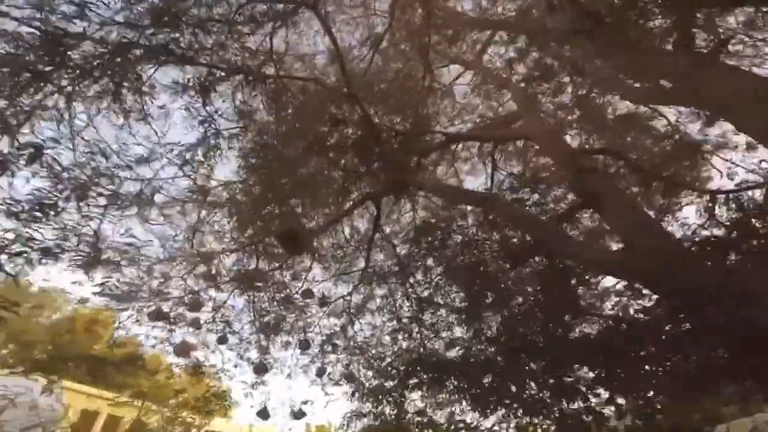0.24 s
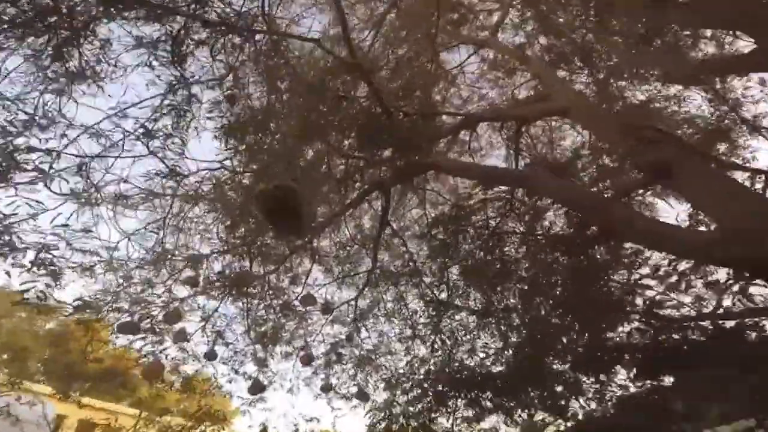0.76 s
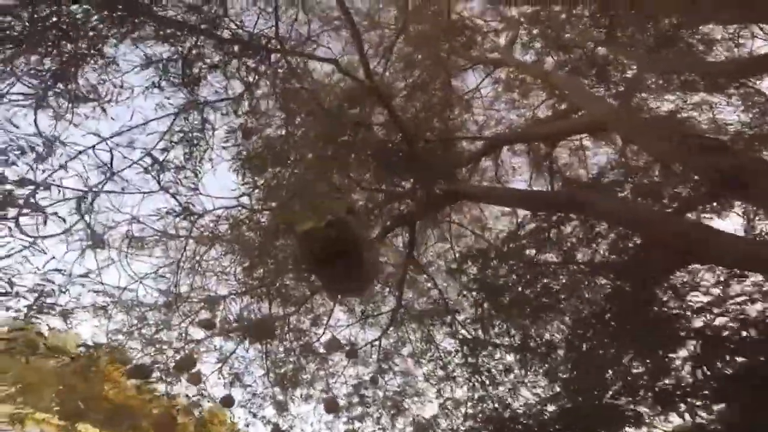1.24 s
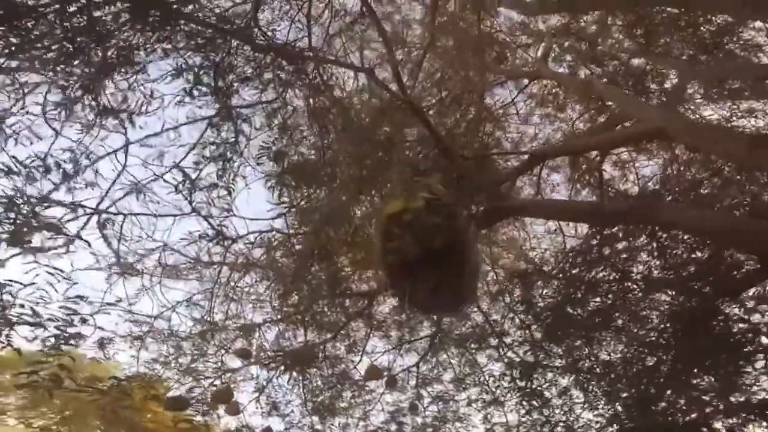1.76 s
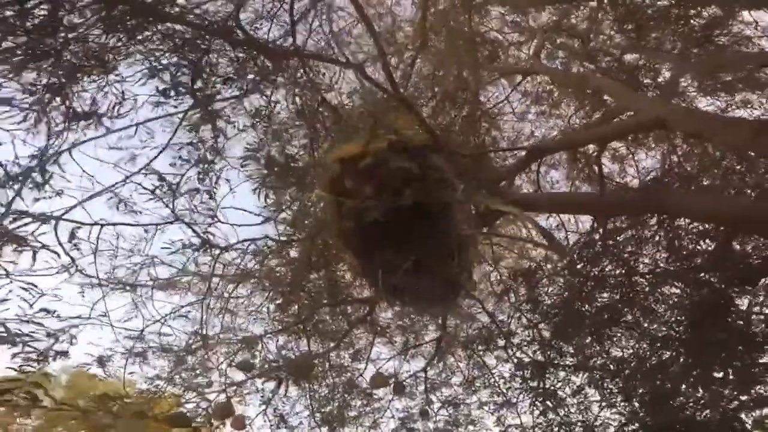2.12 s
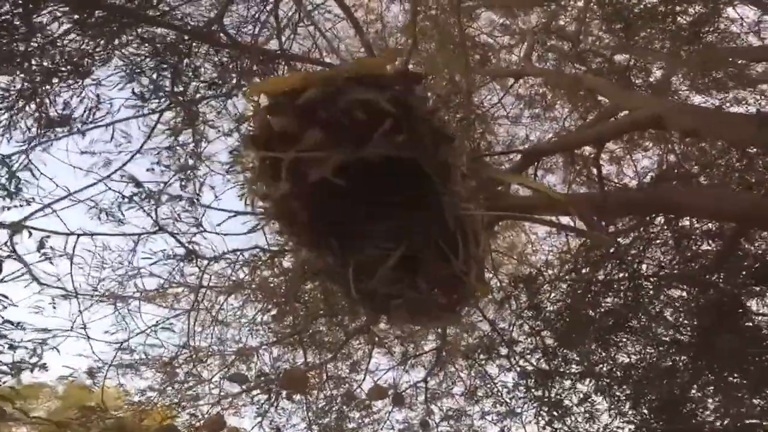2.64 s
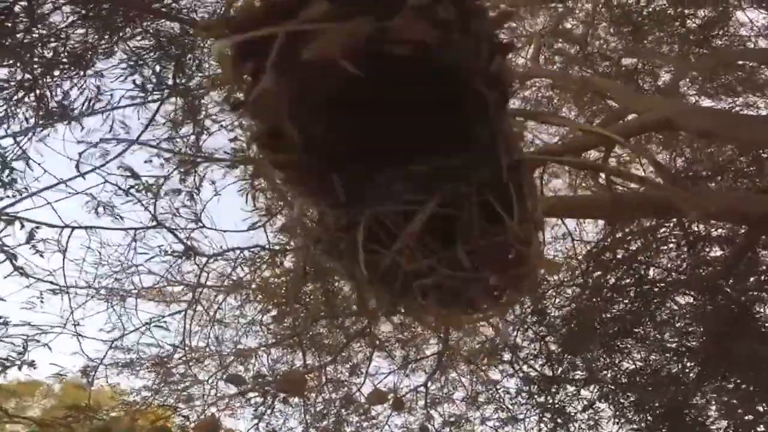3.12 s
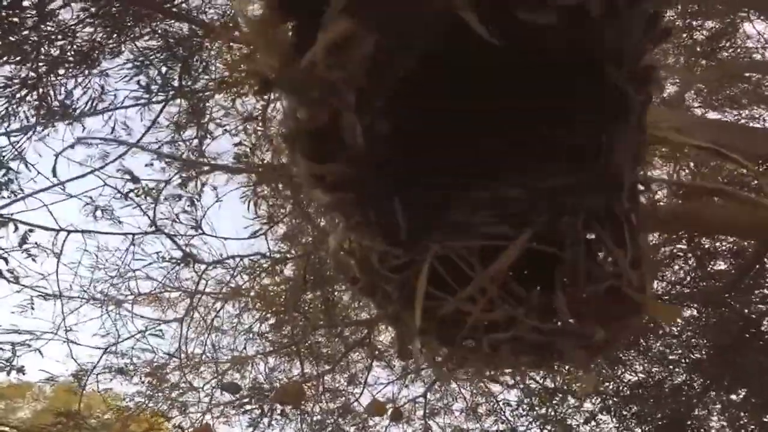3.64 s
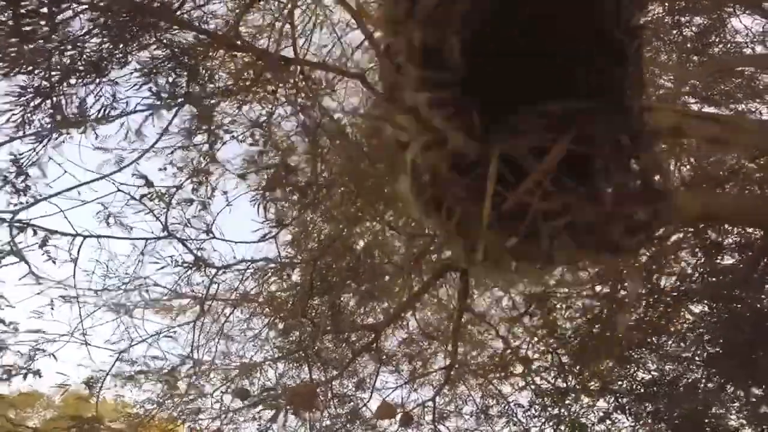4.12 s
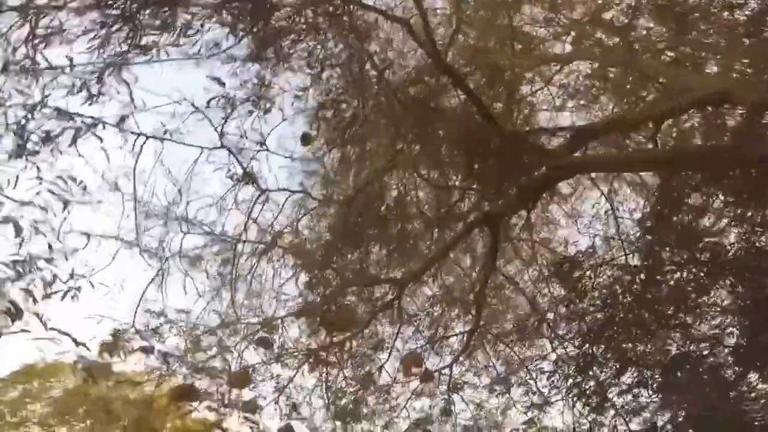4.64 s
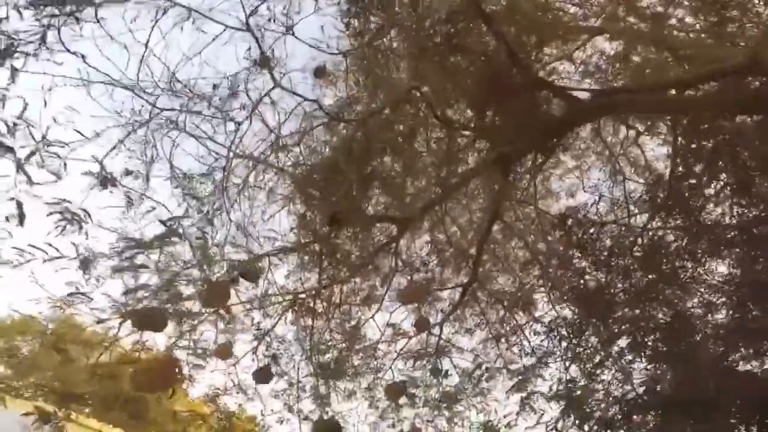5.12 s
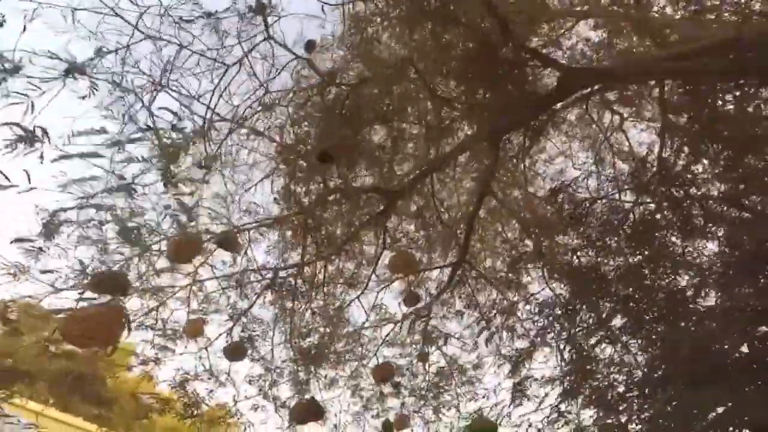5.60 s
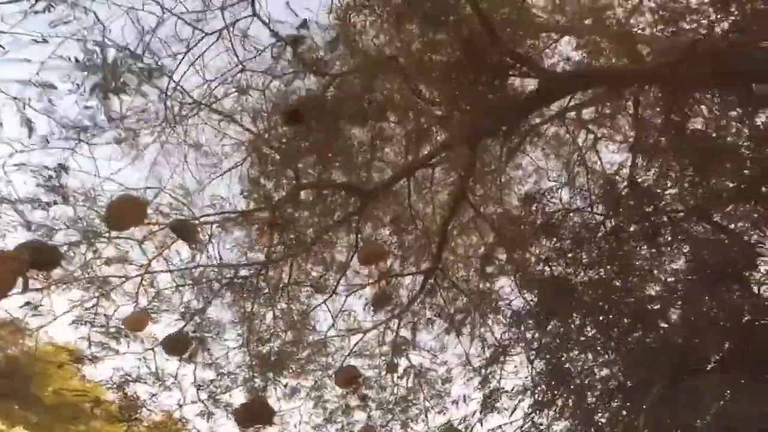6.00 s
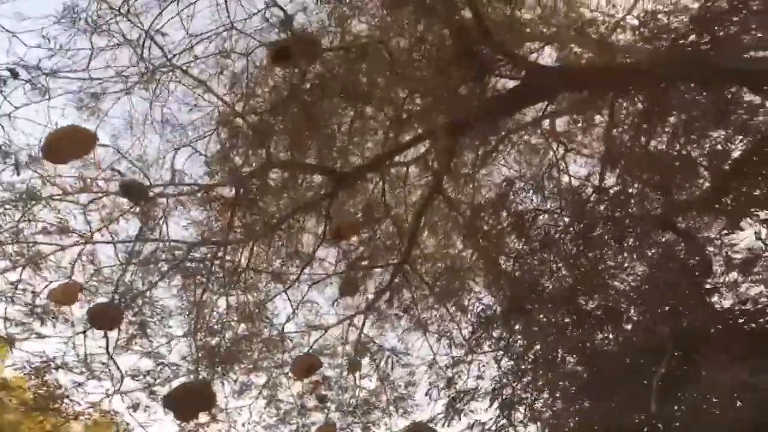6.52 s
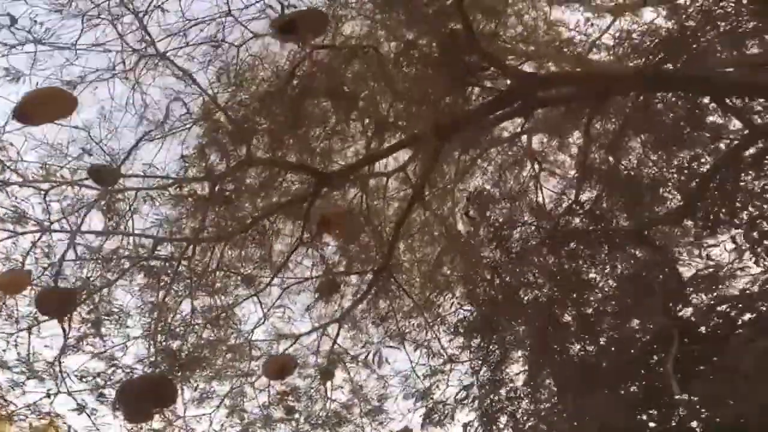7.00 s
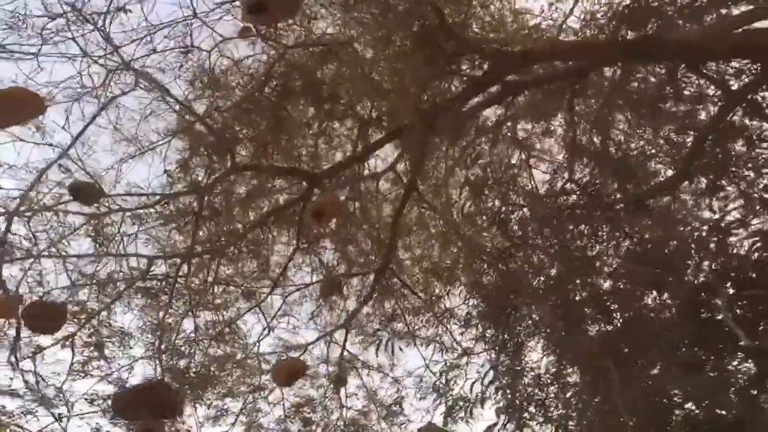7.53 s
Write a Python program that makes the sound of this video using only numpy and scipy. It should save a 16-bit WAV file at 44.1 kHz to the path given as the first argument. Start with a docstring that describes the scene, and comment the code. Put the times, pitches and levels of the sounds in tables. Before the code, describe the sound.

Weaver birds give sharp, down-slurred chips and brief harsh rasps in a nest-hung tree, over early low microphone rumble and handling knocks.

```python
"""Weaver birds call in a tree hung with nests: gliding whistles make short down-slurred chips, often in pairs,
and pulsed noise with a zigzag whistle makes harsh rattling rasps. Scattered echoes surround them; noise makes
the open air and the thin chatter of the colony. At the hand-held microphone, filtered noise rumbles for two
seconds and fades away, damped modes knock, and the housing pulses softly about ten times a second. A decaying
step makes one dry click."""
import sys
import numpy as np
from scipy import signal
from scipy.fft import rfft, irfft
from scipy.io import wavfile
from scipy.ndimage import uniform_filter1d

SR = 44100
rng = np.random.default_rng(int(sys.argv[2]) if len(sys.argv) > 2 else 0)


def pcm_store(signal):
    """Save signal as 16-bit PCM."""
    levels = np.round(np.clip(np.atleast_2d(signal), -1, 1) * 32767)
    wavfile.write(sys.argv[1], SR, levels.astype(np.int16).T)


N = 342216
TIME = np.arange(N) / SR
CHIP_LEAD_S = .035   # room in each chip ahead of its pitch break

# spectrum of the hoarse voice, moved in pitch for each call: frequency_hz, level_db
RASP_SPECTRUM = [(600, -36), (1300, -18.5), (2000, -17), (3000, -17.5), (4500, -7.5), (5700, -0.5),
                 (6600, -15.5), (7500, -19.5), (8400, -32), (9700, -18.5), (11800, -34), (13500, -24),
                 (16000, -40)]
# strength of the distant birds over time: time_s, far_calls_db, colony_chatter_db
DISTANT_LEVELS = [(0.0, -60, -59), (0.34, -61, -59), (0.5, -62, -63), (3.02, -61, -63), (3.18, -59, -53),
                  (4.02, -61, -61), (4.95, -58, -57), (7.76, -63, -65)]
# where the birds sit, by name: left_minus_right_db, left_port_lead_radians, rasp_pitch_factor
PERCHES = {"right": (-4, 1.0, 1.05), "overhead": (-.8, 2.2, 1.09)}


def from_db(db):
    """Amplitude ratio of a level: 20 dB is a factor of ten."""
    return 10 ** (np.asarray(db) / 20)


def rms_one(x):
    """Normalise the root-mean-square amplitude to 1."""
    return x / np.sqrt(np.mean(x ** 2) + 1e-20)


def in_time(rows):
    """Linear interpolation in time of each column of a curve."""
    times_s, *columns = np.transpose(rows)
    return [np.interp(TIME, times_s, column) for column in columns]


def coloured(x, spectrum, shift=1):
    """Linear filtering by a frequency_hz, level_db spectrum, moved in pitch by a factor."""
    hz, db = np.transpose(spectrum)
    bins_hz = np.fft.rfftfreq(len(x), 1 / SR) + 1
    gain = from_db(np.interp(np.log(bins_hz), np.log(hz * shift), db))
    return irfft(rfft(x) * gain, len(x))


def noise(spectrum, size=N, shift=1):
    """Random noise shaped by a spectrum, rms 1."""
    return rms_one(coloured(rng.standard_normal(size), spectrum, shift))


def drift(rate_hz, size=N):
    """Random modulation: normal values, drawn at a given rate and joined by straight lines."""
    steps = np.arange(size) * rate_hz / SR
    count = int(steps[-1]) + 2
    return np.interp(steps, np.arange(count), rng.standard_normal(count))


def add(out, start_s, sound):
    """Superposition: mix a sound in from a given time."""
    start = max(round(start_s * SR), 0)
    part = out[..., start:start + sound.shape[-1]]
    part += sound[..., :part.shape[-1]]


def delayed(x, delay_s):
    """Propagation delay, silent before arrival."""
    return np.interp(TIME - delay_s, TIME, x, left=0)


def panned(left_minus_right_db):
    """Gains of the two ports for a level difference between them."""
    return from_db(np.array([[left_minus_right_db], [-left_minus_right_db]]) / 2)


def chips():
    """Near chips as direct sound and as excitation of the tree; only the hoarse bird sits overhead."""
    # by kind of note: sink_before_break_share, median_fall_s, knee_hz (for a break at 5200 Hz),
    # tail_s, onset_db, hoarseness_db, most_echo_db
    kinds = {"long": (.05, .0016, 3800, .0125, -7, -22, -43.3),
             "short": (.105, .0019, 3600, .008, -5.5, -21, -45.5),
             "high": (.115, .0036, 3780, .0095, -13, -17, -41.5),
             "hoarse": (.11, .004, 3780, .012, -14, -14, -38.5)}
    direct, send = np.zeros((2, N)), np.zeros(N)
    for break_s, top_hz, level_db, kind in notes():
        *voice_settings, most_echo_db = kinds[kind]
        call = chip(top_hz, *voice_settings)
        perch = "overhead" if kind == "hoarse" else "right"
        start_s = break_s - CHIP_LEAD_S
        add(direct, start_s, from_perch(call * from_db(level_db), perch))
        add(send, start_s, call * from_db(echo_db(level_db, most_echo_db, -4)))
    return direct, send


def notes():
    """Call and answer: every single note, with each pair opened into a long note and a short one."""
    # near chips: pitch_break_s, top_pitch_hz, level_db, kind
    calls = [(.275, 5760, -37.8, "long"), (.464, 5620, -41.5, "short"), (1.096, 5920, -35, "long"),
             (1.169, 5450, -39.5, "short"), (1.207, 5580, -40, "short"), (1.767, 5530, -39.5, "long"),
             (1.797, 5350, -48, "short"), (2.353, 5540, -35, "pair"), (2.85, 6900, -57, "high"),
             (2.945, 6800, -59, "high"), (3.025, 5520, -34.5, "long"), (3.564, 6900, -54, "high"),
             (3.768, 5560, -35, "pair"), (4.019, 6700, -50, "high"), (4.256, 5550, -36.5, "pair"),
             (4.45, 5600, -40, "short"), (4.599, 7000, -50, "high"), (4.855, 6830, -51, "high"),
             (4.901, 5480, -36, "long"), (5.573, 7030, -45, "high"), (5.675, 5540, -38.5, "pair"),
             (6.012, 7030, -45, "high"), (6.381, 6920, -37.5, "high"), (6.532, 5430, -34.8, "pair"),
             (6.825, 6870, -34.5, "high"), (7.191, 5570, -43.5, "short"), (7.337, 6900, -32.7, "hoarse"),
             (7.421, 6650, -34.7, "hoarse")]
    answer_s, answer_pitch_factor, answer_db = .0805, .968, -.9   # against the first note
    for break_s, top_hz, level_db, kind in calls:
        if kind == "pair":
            yield break_s, top_hz, level_db, "long"
            yield break_s + answer_s, top_hz * answer_pitch_factor, level_db + answer_db, "short"
        else:
            yield break_s, top_hz, level_db, kind


def chip(top_hz, sink_share, fall_s, knee_hz, tail_s, onset_db, rough_db,
         hold_s=0.0275, sag_per_s=6.5, droop_share=.08, tail_db=-8, drop_db=-4.5,
         beat_hz=3900, beat_db=-17.5, beat2_db=-21.5, under_db=-17.5, octave_db=-14,
         waver=0.012, beat_waver=.02, shimmer_db=3.0):
    """Two-voiced syrinx: a whistle flicks up, sinks, then breaks down; a second vibration adds side tones."""
    t = np.arange(int((CHIP_LEAD_S + tail_s + .004) * SR)) / SR - CHIP_LEAD_S   # 0 at the break
    after = np.maximum(t, 0)
    progress = np.clip(1 + t / hold_s, 0, 1)
    break_hz = top_hz * (1 - sink_share)
    height = break_hz / 5200

    held_hz = np.interp(progress, [0, .2, 1], [top_hz * .88, top_hz, break_hz])
    fallen = 1 - np.exp(-after / (fall_s * rng.lognormal(0, .2)))
    slack = 1 - sag_per_s * after - droop_share * (after / t[-1]) ** 3
    falling_hz = held_hz + (knee_hz * height ** .5 - break_hz) * fallen
    hz = falling_hz * slack * (1 + waver * drift(920, len(t)))
    phase = 2 * np.pi * np.cumsum(hz) / SR

    wavering_beat_hz = beat_hz * (1 + beat_waver * height ** 3 * drift(1527, len(t)))
    beat = 2 * np.pi * np.cumsum(wavering_beat_hz) / SR
    sides = from_db(beat_db) * np.sin(phase + beat) + from_db(beat2_db) * np.sin(phase + 2 * beat)
    lower_sides = np.sin(phase - beat) + .5 * np.sin(phase - 2 * beat)
    sides += from_db(under_db) * height ** 3 * lower_sides

    effort = from_db(onset_db * np.maximum(1 - progress / .65, 0))
    voice = np.sin(phase) + (1 - fallen) * (1 - progress ** 2 / 2) * sides
    voice += fallen ** 2 * from_db(octave_db) * np.sin(2 * phase)
    # strain makes the voice hoarse
    voice += from_db(rough_db) * effort * noise(RASP_SPECTRUM, len(t), height)
    # the voice thins while it drops
    fade_db = tail_db * fallen + drop_db * np.sin(np.pi * fallen)
    gate = np.clip((t + hold_s) / 0.0047, 0, 1) * np.clip((t[-1] - t) / 0.007, 0, 1)
    return np.sqrt(2) * voice * gate * effort * from_db(fade_db + shimmer_db * drift(432, len(t)))


def rasps(swell_s=.037, release_s=0.0095, onset_db=-14, start_pitch=.83, slap_hz=214, depth=.62, jitter=.08,
          whistle_hz=5800, whistle_db=-4, swing=.13, waver=.04):
    """Pulsed source and rising throat resonances: the syrinx slaps open and shut, swelling and stopping."""
    # rasps: start_s, level_db, perch
    rasp_calls = [(.116, -27.8, "right"), (1.2, -30.3, "right"), (3.065, -28.5, "overhead"),
                  (3.195, -40.5, "overhead"), (3.294, -49, "overhead"), (3.425, -26.5, "right"),
                  (4.946, -27, "right")]
    direct, send = np.zeros((2, N)), np.zeros(N)
    t = np.arange(SR // 10) / SR
    opening = np.maximum(1 - t / swell_s, 0)   # falls from 1 to 0 during the swell
    rise = 1 - (1 - start_pitch) * opening ** 3
    release = np.exp(-np.maximum(t - swell_s, 0) / release_s)
    envelope = from_db(onset_db * opening ** 2) * release * np.minimum(t / 0.0027, 1)
    for start_s, level_db, perch in rasp_calls:
        shift = PERCHES[perch][2]
        cycle = 2 * np.pi * np.cumsum(slap_hz * (1 + jitter * drift(170, len(t)))) / SR
        bursts = 1 + depth * (1 - opening / 2) * np.cos(cycle)
        # reading fourfold oversampled noise at a growing speed raises the resonances
        fine_noise = signal.resample(noise(RASP_SPECTRUM, len(t), shift), len(t) * 4)
        throat = np.interp(np.cumsum(rise) * 4, np.arange(len(t) * 4), fine_noise)
        zigzag = 1 - swing * np.cos(cycle) + waver * drift(1500, len(t))
        hz = whistle_hz * shift * rise * zigzag
        throat += from_db(whistle_db) * np.sqrt(2) * np.sin(2 * np.pi * np.cumsum(hz) / SR)
        # every slap is about equally strong
        throat /= np.sqrt(uniform_filter1d(throat ** 2, size=64) + 1e-12)
        call = envelope * rms_one(bursts * throat)
        add(direct, start_s, from_perch(call * from_db(level_db), perch))
        add(send, start_s, call * from_db(echo_db(level_db, -35.2, 1.5)))
    return direct, send


def from_perch(call, perch):
    """Directional cues: a level difference and a turn of phase between the two ports."""
    left_db, turn, _ = PERCHES[perch]
    turned = np.real(signal.hilbert(call) * np.exp(-1j * turn))
    return np.array([call, turned]) * panned(left_db)


def echo_db(level_db, most_db, wet_db):
    """Reverberant level: a bird that turns away still fills the tree; only the echo of faint calls sinks."""
    return min(most_db, level_db + wet_db)


def far_calls(waver=.04, faint_per_s=10, low_hz=1000, high_hz=3400, faint_db=3):
    """Frequency-modulated short notes from far off; faint random ones rise and sink with the far wash."""
    # far birds with lower voices: centre_s, pitch_hz, level_db
    distinct = [(2.53, 2950, -52), (3.7, 4050, -53), (4.62, 2890, -49.5), (5.02, 2830, -52)]
    out, size = np.zeros(N), SR // 20
    wash_db = in_time(DISTANT_LEVELS)[0]
    faint = []
    for when, pitch in rng.random((int(faint_per_s * N / SR), 2)):
        hz = low_hz * (high_hz / low_hz) ** pitch
        faint.append((when * N / SR, hz, wash_db[int(when * N)] + faint_db))
    for centre_s, hz, level_db in distinct + faint:
        phase = 2 * np.pi * np.cumsum(hz * (1 + waver * drift(480, size))) / SR
        note = np.sqrt(2) * np.hanning(size) * np.sin(phase)
        add(out, centre_s - size / SR / 2, from_db(level_db) * note)
    return out


def tree(x, t60_s=.61, leaf_cut_hz=11000):
    """Multiple scattering: branches and nests spread the calls into a thin tail, different at each side."""
    t = np.arange(int(.6 * SR)) / SR
    decay = from_db(-60 * t / t60_s) * np.clip((t - .005) / 0.002, 0, 1)
    scatter = rng.standard_normal((2, len(t))) * decay
    scatter *= 1 + 3.6 * np.exp(-t / 0.036)   # near twigs answer first and loudest
    # leaves soak up the top
    x = signal.sosfilt(signal.butter(2, leaf_cut_hz, fs=SR, output="sos"), x)
    return np.array([signal.fftconvolve(x, side / np.linalg.norm(side))[:N] for side in scatter])


def handling(rumble_side_db=-20, thud_db=20.5, thud_follows=.38, pulse_db=-41, pulse_period_s=.10238,
             bump_db=-3, bump_s=0.0026, click_s=1.7975, click_db=-20.5, click_decay_s=0.007,
             stiff_hz=140, snap_db=3.5):
    """Structure-borne sound: rumble, knocks and soft regular housing pulses. Apart from these, one dry click: a
    sudden step that dies away."""
    # spectrum of the rumble: frequency_hz, level_db
    rumble_spectrum = [(12, -13.5), (22, -1), (33, 1.5), (48, -8.5), (70, -12), (100, -17.5), (150, -32),
                       (300, -48.5), (700, -72.5)]
    # knocks on the housing: contact_s, body_db, bright_snap_db (before the common snap gain)
    knocks = [(.577, -31, -44), (.590, -31.5, -37), (.652, -28.5, -32.5), (.876, -29.5, -33),
              (.980, -21.5, -36), (2.022, -18.3, -37), (2.126, -24.5, -60), (2.698, -23.5, -36),
              (2.869, -35, -60), (2.945, -41, -57), (3.208, -32.5, -51), (3.632, -38, -66),
              (3.962, -24, -66), (5.930, -17.5, -30)]
    # modes of the housing, the deep thud and the pulses: frequency_hz, relative_level_db, t60_s
    body_modes, thud_modes, pulse_modes = [(176, -16, 0.036), (211, 3.3, 0.088), (299.3, 1, 0.061),
                                           (340, -3.5, 0.058), (530, -3.5, 0.07), (673, 4.5, 0.019)], [(66, 6, 0.066), (101.4, -1, 0.18)], [(162.3, 5, 0.063), (212, 5.5, 0.025),
                                                                       (310, 3.5, .03)]
    # runs of pulses: first_s, end_s
    pulse_runs = [(.155, 1.75), (1.948, 2.9), (3.024, 7.75)]

    rumble = rumble_level()
    side = from_db(rumble_side_db) * noise(rumble_spectrum) * [[1], [-1]]
    out = rumble * (noise(rumble_spectrum) + side)
    housing = np.zeros((2, N))
    for contact_s, body_db, tick_db in knocks:
        add(housing, contact_s - .001, from_db(body_db) * struck(body_modes))
        add(housing, contact_s, from_db(tick_db + snap_db) * snap())
        # the thud scales with the rumble and follows only part of the knock's level
        thud_gain = rumble[int(contact_s * SR)] * from_db(thud_db + thud_follows * body_db)
        add(out, contact_s - .001, -thud_gain * struck(thud_modes))

    t = np.arange(SR // 5) / SR
    bump = np.exp(-((t - .005) / bump_s) ** 2)   # each pulse also nudges the air at the ports
    for first_s, end_s in pulse_runs:
        for pulse_s in np.arange(first_s, end_s, pulse_period_s):
            add(housing, pulse_s - .003, from_db(pulse_db) * struck(pulse_modes))
            add(out, pulse_s, from_db(bump_db) * rumble[int(pulse_s * SR)] * bump)
    # the click: a sudden step that dies away
    add(out, click_s, -from_db(click_db) * np.exp(-t / click_decay_s))
    # a stiff shell has no bass
    out += signal.sosfilt(signal.butter(6, stiff_hz, "high", fs=SR, output="sos"), housing)
    return out * panned(-1.0)


def rumble_level(start_db=-27.7, steady_end_s=2.05, fade_db_per_s=10.1, floor_db=-73.5):
    """Exponential decay of the rumble: steady for two seconds, then fading towards a floor."""
    fading_s = np.maximum(TIME - steady_end_s, 0)
    return from_db(start_db - fade_db_per_s * fading_s) + from_db(floor_db)


def struck(modes, rock=1, lag_s=0.002, turn_hz=330):
    """Damped modes: dispersive bending waves bring low ones later; higher ones rock the ports in opposition."""
    t, out = np.arange(SR // 5) / SR, 0
    for hz, level_db, t60_s in modes:
        age = np.maximum(t - lag_s * np.sqrt(200 / hz), 0)   # lag_s holds at 200 Hz
        turn = rock * np.pi * hz ** 2 / (hz ** 2 + turn_hz ** 2) * np.array([[.5], [-.5]])
        decay = from_db(level_db + rng.standard_normal() - 60 * age / t60_s)
        onset = -np.expm1(-4 * hz * age)
        out = out + decay * onset * np.sin(2 * np.pi * hz * age + turn)
    return out


def snap(decay_s=0.0044, top_hz=2230):
    """Contact noise of a knock: a brief dull crack, partly coherent at the two ports."""
    # spectrum of the crack: frequency_hz, level_db
    crack_spectrum = [(300, -4), (650, 9), (1100, -2), (2200, -5)]
    t = np.arange(SR // 40) / SR
    separate = np.array([noise(crack_spectrum, len(t)), noise(crack_spectrum, len(t))])
    crack = separate + noise(crack_spectrum, len(t))
    return signal.sosfilt(signal.butter(4, top_hz, fs=SR, output="sos"), crack * np.exp(-t / decay_s))


def background(air_db=-52, far_db=.5, colony_db=.4, flutter_db=1):
    """Diffuse field: open air, with far birds and the rest of the colony blurred into a fluttering wash."""
    # spectra of the air, the far birds and the colony: frequency_hz, level_db
    air_spectrum, far_spectrum, chatter_spectrum = [(95, -52), (122, -10), (160, 3.5), (240, -1),
                                                    (350, -7.5), (600, -9.5), (1000, -15), (2000, -16.5),
                                                    (4000, -23), (8000, -28.5), (12000, -33), (15500, -58)], [(1000, 3), (2000, -5), (2900, 5.5),
                                                                 (3800, -4), (6000, -18.5)], [(2500, -26), (4000, -1),
                                                                              (5300, 4), (6200, 7),
                                                                              (7200, 1), (8500, -4),
                                                                              (10000, -1), (15000, -65)]
    # stereo width of the air: frequency_hz, side_minus_mid_db
    air_width = [(60, -32), (150, -2), (300, 1.5), (640, 7), (1400, 9), (3000, -15), (7000, -1), (15000, 1)]
    far, chatter = from_db(in_time(DISTANT_LEVELS))
    side = coloured(noise(air_spectrum), air_width) * [[1], [-1]]
    out = from_db(air_db) * (noise(air_spectrum) + side)
    washes = (far_spectrum, from_db(far_db) * far), (chatter_spectrum, from_db(colony_db) * chatter)
    for spectrum, level in washes:
        both_ports = np.array([noise(spectrum), noise(spectrum)])
        out += level * both_ports * from_db(flutter_db * drift(28))
    return out


def scene(ground_s=0.019, ground_db=-16):
    """Superposition of paths: calls arrive directly, off the ground and through the crown."""
    chip_direct, chip_send = chips()
    rasp_direct, rasp_send = rasps()
    direct = chip_direct + rasp_direct
    ground = from_db(ground_db) * np.array([delayed(side, ground_s) for side in direct])
    crown = tree(chip_send + rasp_send + far_calls())   # far calls come only through the foliage
    return direct + ground + crown + background() + handling()


def record(dry, cutoff_hz=15800):
    """Band limitation: a steep low-pass filter cuts the top."""
    return signal.sosfilt(signal.ellip(12, .1, 90, cutoff_hz, fs=SR, output="sos"), dry)


dry = scene()
out = record(dry)
pcm_store(out)
```